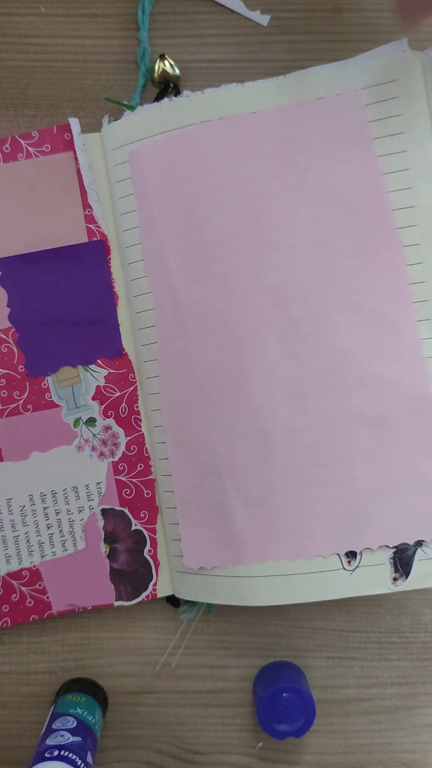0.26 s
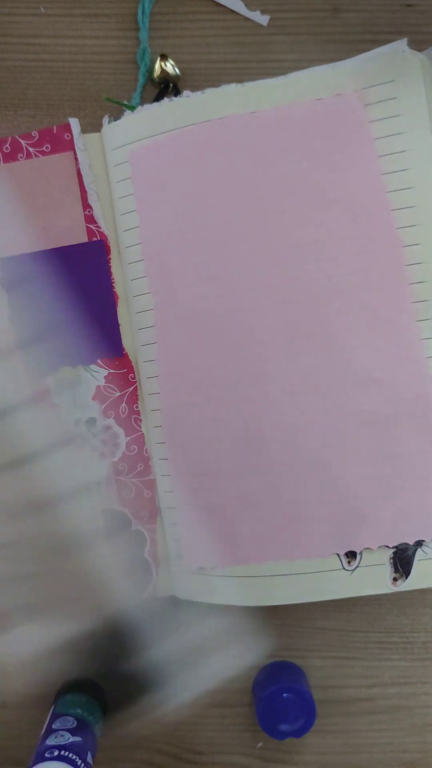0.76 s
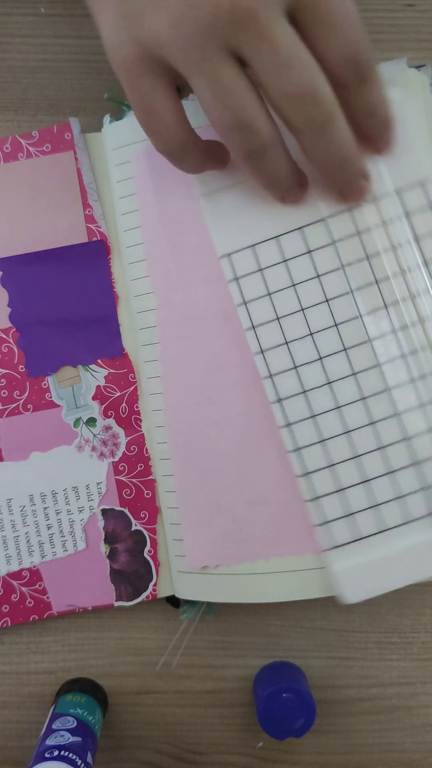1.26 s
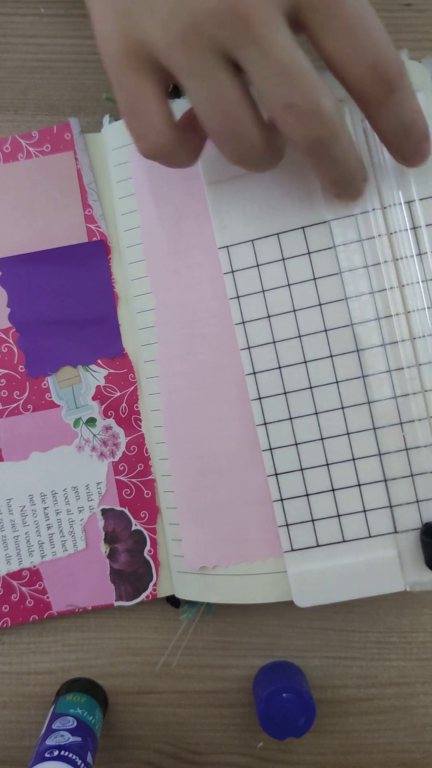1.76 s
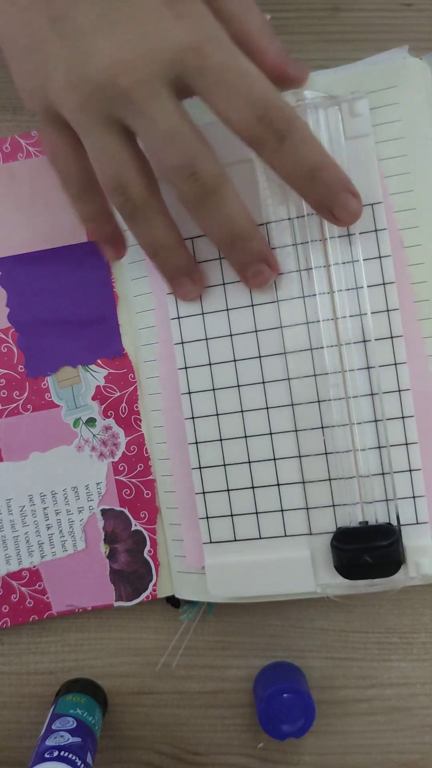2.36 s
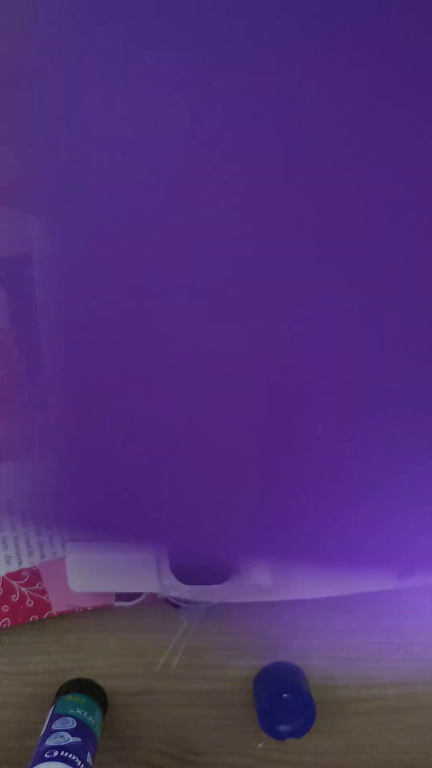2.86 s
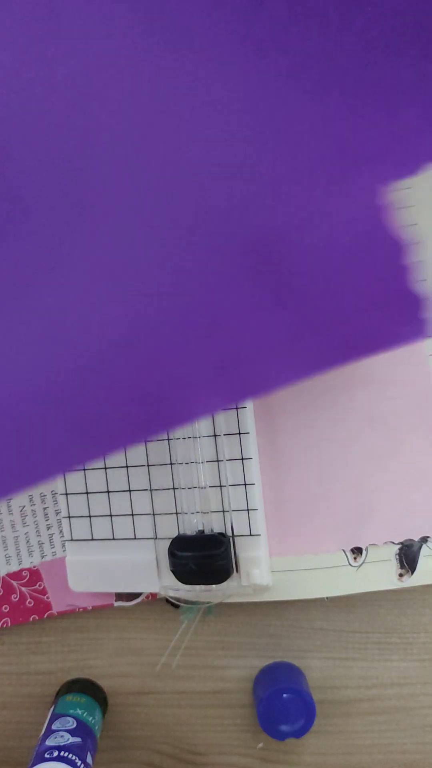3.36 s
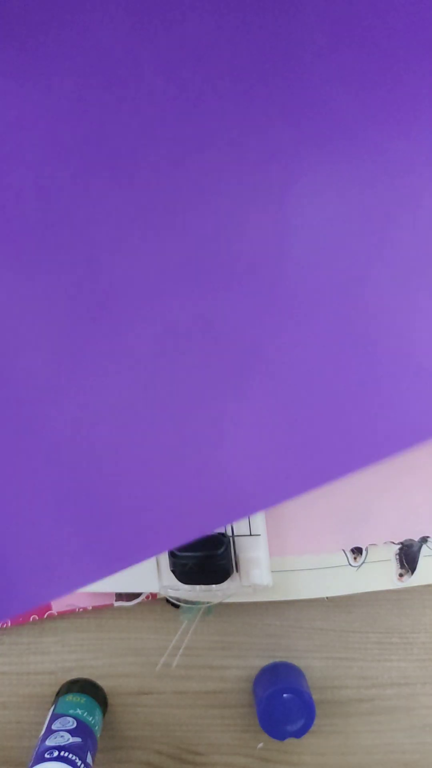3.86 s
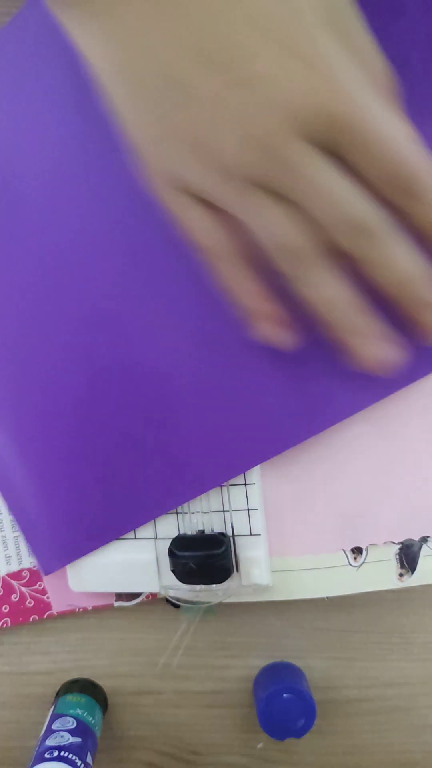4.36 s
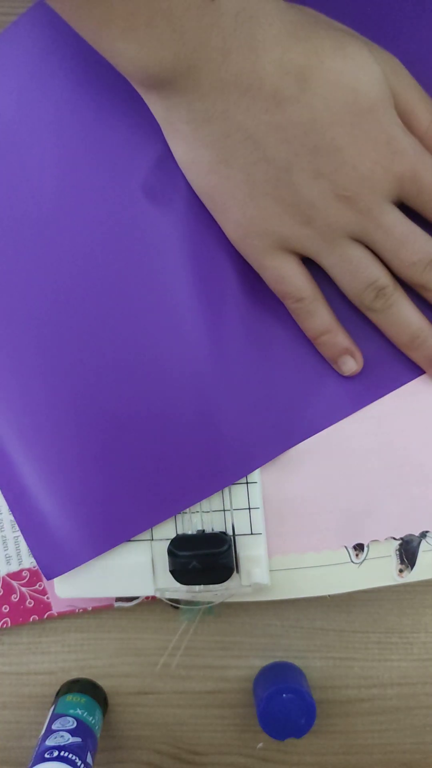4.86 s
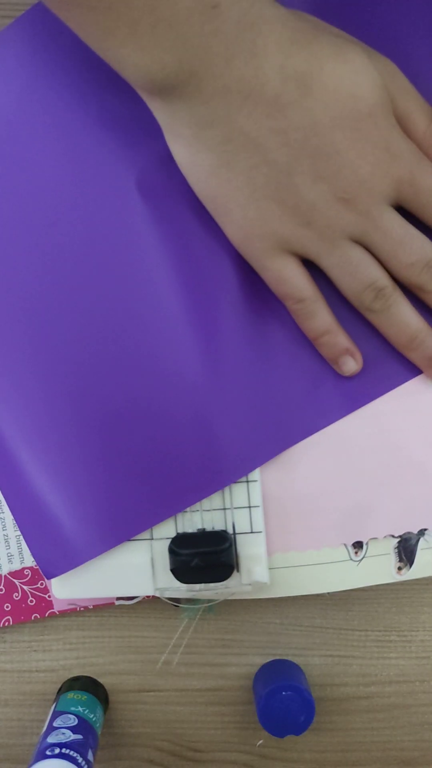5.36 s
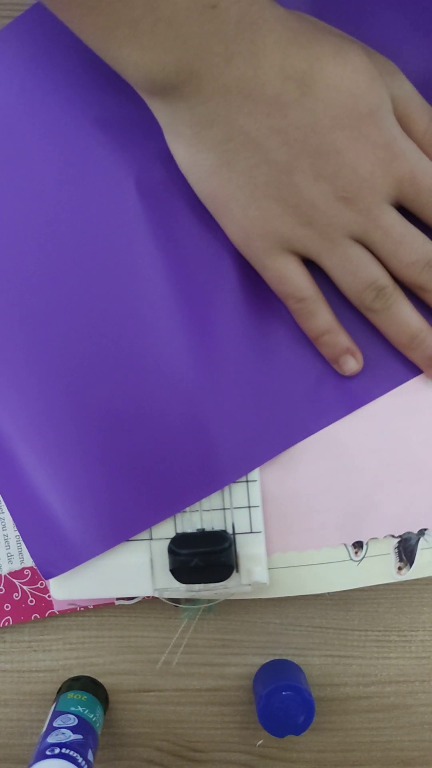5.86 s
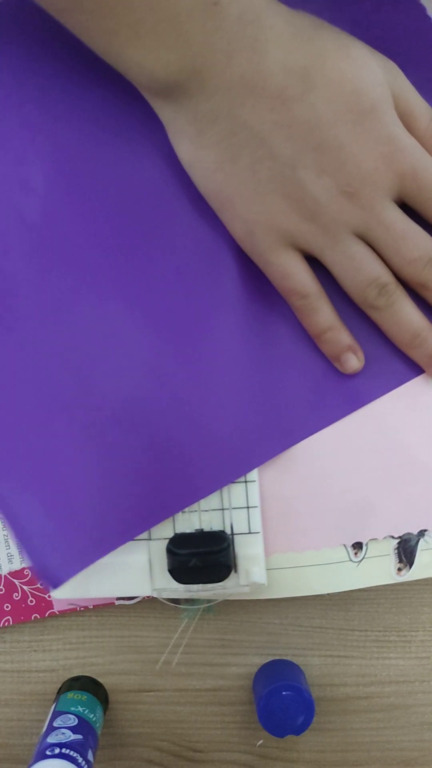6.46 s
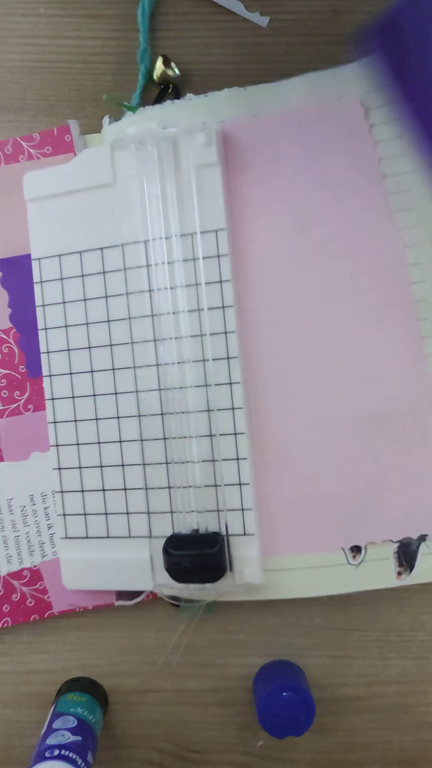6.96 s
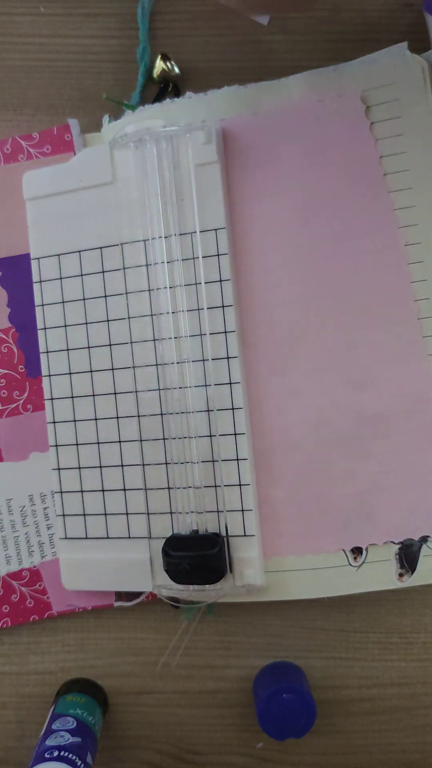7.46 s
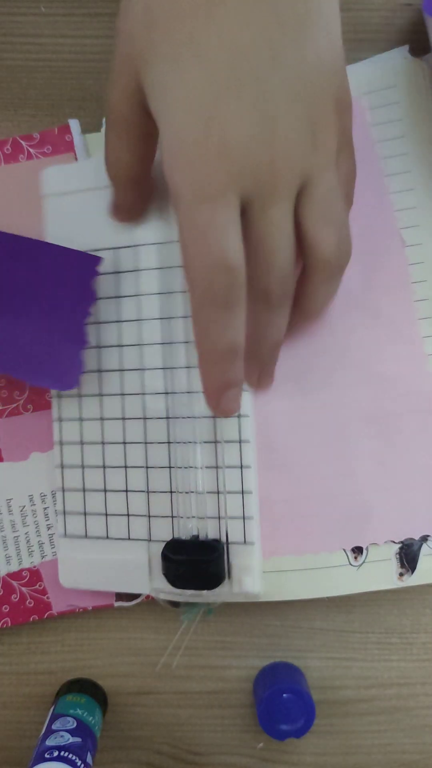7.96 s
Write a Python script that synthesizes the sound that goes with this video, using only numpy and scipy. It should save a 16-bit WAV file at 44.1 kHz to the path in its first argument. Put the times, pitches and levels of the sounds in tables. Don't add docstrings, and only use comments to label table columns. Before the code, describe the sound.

Sharp plastic knocks with quick rebounds, quiet sliding and paper handling, two short tearing pulls and one long harsh rip, then faint rustling.

```python
import sys
import numpy as np
from scipy import signal
from scipy.fft import rfft, irfft
from scipy.io import wavfile
from scipy.ndimage import uniform_filter1d

SR = 44100
rng = np.random.default_rng(int(sys.argv[2]) if len(sys.argv) > 2 else 0)


def attenuation_scalar(level_db):
    decades = np.asarray(level_db, float) / 20
    return 10 ** decades


def wav_record(signal):
    frames = np.transpose(np.atleast_2d(signal))
    bounded = np.clip(frames, -1, 1)
    quanta = np.round(bounded * 32767).astype(np.int16)
    wavfile.write(sys.argv[1], SR, quanta)


N = 362502


def tear():
    # t/s, level/dB
    pull_forces = [
        [(4.82, -60), (4.832, -58), (4.848, -39), (4.886, -42), (4.95, -85)],
        [(5.02, -63), (5.038, -62), (5.122, -52.5), (5.202, -54), (5.228, -66), (5.334, -50), (5.37, -97)],
        [(5.44, -71), (5.484, -62.5), (5.74, -56.5), (5.9, -51.5), (6.18, -44), (6.262, -35), (6.37, -36.5),
         (6.46, -37), (6.522, -35.5), (6.575, -82)],
    ]
    # t/s, peak level/dB, length/s
    pull_jerks = [(4.805, -38, .02), (4.815, -39, .02), (4.828, -34, .02), (5.033, -35, .03),
                  (5.061, -33, .03), (5.193, -32, .02), (4.843, -28, 0.032), (4.866, -26, 0.05),
                  (4.879, -24, 0.066), (4.901, -23.5, 0.036), (5.038, -28.5, 0.091), (5.07, -26.5, 0.043),
                  (5.08, -26, 0.036), (5.1, -27, 0.028), (5.125, -23, 0.081), (5.161, -20, 0.03),
                  (5.205, -29, 0.029), (5.217, -23, 0.06), (5.229, -19.5, 0.058), (5.138, -24.5, 0.044),
                  (5.1856, -31, .03), (5.27, -24, 0.13), (5.284, -25.5, 0.049), (5.24, -21.5, 0.027),
                  (5.304, -34, .04), (5.3244, -26.5, 0.03), (5.338, -32.5, 0.026),
                  (5.448, -35.5, 0.045), (5.473, -27.5, 0.14), (5.494, -25.5, 0.12), (5.521, -27.5, 0.12),
                 (5.537, -19, 0.038), (5.55, -26, 0.037), (5.507, -31, .04), (5.566, -24.5, 0.028),
                 (5.601, -24, 0.06), (5.613, -30, 0.093), (5.651, -32, 0.037), (5.673, -30, 0.037),
                 (5.689, -23, 0.035), (5.701, -26.5, .04), (5.735, -32, .03), (5.7496, -27, 0.07),
                 (5.766, -24, 0.028), (5.789, -27, 0.045), (5.812, -26.5, 0.031), (5.822, -25, .04),
                 (5.835, -16.5, 0.03), (5.847, -19, 0.05), (5.885, -19.5, 0.042), (5.891, -25.5, 0.027),
                 (5.918, -23.5, 0.043), (5.929, -18.5, 0.031), (5.934, -18.5, 0.026), (5.954, -18.5, 0.036),
                 (5.976, -20, 0.056), (5.988, -24, 0.038), (6.0046, -20.5, 0.046), (6.016, -24, 0.042),
                 (6.035, -20.5, 0.1), (6.057, -23.5, 0.047), (6.067, -21, 0.057), (6.094, -25, 0.04),
                 (6.102, -24, 0.038), (6.125, -27, 0.14), (6.155, -23, 0.079), (6.188, -26, 0.3),
                 (6.2, -30, .2), (6.249, -25, 0.035), (6.273, -15.5, 0.051), (6.285, -20, .04),
                 (6.308, -15, .02), (6.315, -19, 0.086), (6.343, -19, 0.067), (6.384, -6.5, 0.022),
                 (6.476, -24, 0.05), (6.482, -18, 0.044), (6.493, -18, 0.042), (6.516, -18.5, 0.049),
                 (6.536, -39, 0.031)]
    # sheet flex/dB, edge ring/dB, finest fibres/dB, board/dB
    pull_mix = [
        (-2.5, -11.5, 4.5, -36.5),
        (-3.5, -22, 0.5, -32),
        (-4, -14.5, -4, -34.5),
    ]
    # f/Hz, density level/dB
    fibre_spectrum = [(530, -46.5), (900, -7), (1940, 0.5), (2110, -10.5), (2350, -3), (3400, -3),
                      (5590, -1.5), (7480, 0.26), (9780, -6.5), (15900, -10), (16500, -30.5)]
    # f/Hz, bandwidth/Hz, level/dB
    sheet_modes = [(565, 90, -0.5), (834, 74, -8), (994, 180, -2.5), (1570, 820, -24)]
    # f/Hz, bandwidth/Hz, level/dB
    board_modes = [(881, 70, -9), (1576, 53, 3.5), (1740, 88, -6), (1950, 90, -1), (2797, 330, -2),
                   (3330, 150, -9), (3740, 130, -3), (4120, 60, -0.5), (4700, 80, -10), (5460, 100, -9),
                   (6100, 37, -2.5), (6950, 70, -9), (7560, 140, -2)]

    s, jerk_db, length = np.transpose(pull_jerks)
    steady = curve(pull_forces)
    jerks = bursts(s, jerk_db - 12.5, 0.82 * length, 0.002)
    snap_db, snap_s = -14.5, 0.0048
    snaps = bursts(s, jerk_db + snap_db, 0 * s + snap_s, 0.00022)
    force = crackle(2.4, 1., 600) * sticking() * (steady + jerks + snaps)

    pull_starts = [span[0][0] for span in pull_forces[1:]]
    pull = np.searchsorted(pull_starts, np.arange(N) / SR)
    flex, edge, fine, board = force * attenuation_scalar(np.array(pull_mix)[pull].T)
    edge = edge * np.clip(steady / attenuation_scalar(-40.5), .15, 3) ** .4
    edge = band(edge, 2280, 2440, order=1)

    sheet = ring(flex, [(hz, db, np.log(1000) / (np.pi * width)) for hz, width, db in sheet_modes])
    sheet = band(sheet, 400, 3000)
    board = ring(board, [(hz, db, np.log(1000) / (np.pi * max(width, 90))) for hz, width, db in board_modes])

    fibres = attenuation_scalar(0.5) * colour(force, fibre_spectrum)
    low_flex = attenuation_scalar(-19.5) * band(flex, 78, 320)
    fine = attenuation_scalar(-5.5) * band(fine, 9300, 21000)
    return fibres + attenuation_scalar(-37.0) * sheet + low_flex + edge + board + fine


def sticking():
    # end t/s, depth level/dB, length/s
    catches = [(5.07, -8, .01), (5.097, -8, .012), (5.125, -6, 0.0092), (5.161, -8, .01),
               (5.185, -10, .012), (5.268, -10, .016), (5.565, -6, .008), (5.6, -4, .015),
               (5.689, -6, .008), (5.747, -5, .008), (5.788, -8, .012), (5.812, -10, .012),
               (5.885, -4, 0.018), (5.917, -10, .012), (5.953, -10, .01), (5.976, -6, .008),
               (6.005, -12, .01), (6.094, -10, .01), (6.124, -8, 0.013), (6.186, -8, 0.011),
               (6.383, -5, .015), (6.474, -5, .012)]
    db = np.zeros(N)
    for end, depth_db, length in catches:
        size = int(np.clip(length, .003, .04) * SR)
        dip = np.sin(np.linspace(0, 2.4, size)) ** 2
        db[int(end * SR) - size:int(end * SR)] += min(depth_db, 0) * dip
    return attenuation_scalar(db)


def knocks():
    # t/s, crack peak level/dB, woody body level/dB, desk thud level/dB, crack length/s
    blows = [
        (0.0149, -12, -24, -34.5, 0.046),
        (0.3692, -3, -34.5, -32.5, 0.043),
        (0.393, -23, -34.5, -24, 0.067),
        (0.425, -30, -35.5, -32.5, 0.053),
        (0.46, -28.5, -40, -33, 0.027),
        (0.498, -59, -43, -31.5, 0.023),
        (0.5127, -44, -42.5, -37.5, 0.045),
        (0.5356, -39, -17, -22, 0.017),
        (0.5477, -57, -41, -27.5, 0.039),
        (0.601, -54, -49, -39.5, 0.04),
    ]
    # f/Hz, density level/dB
    crack_spectrum = [(180, -6), (300, -17), (1020, -13.5), (1600, -2.5), (2790, -2), (3710, -1.5),
                      (6140, 2), (7800, 2), (9810, -10), (14900, -17.5), (16500, -43)]
    # f/Hz, level/dB, T60/s
    desk_modes = [(124, -6.5, 0.096), (178, -1.7, 0.14), (249, -3.5, 0.11), (274, -1, 0.24), (345, -12, .2),
                  (565, -12.5, .18), (595, -5.5, 0.062), (665, -7, 0.032), (798, -4, 0.098)]
    # f/Hz, level/dB, T60/s
    plastic_modes = [(7065, -23, 0.14), (7740, -15, 0.04), (4650, -31.5, .06), (2740, -25.5, .05),
                     (1500, -24, .06)]

    s, crack_db, wood_db, thud_db, length = np.transpose(blows)
    rattle = crackle(1., 1., 500)
    buzz = bursts(s, crack_db - 23.0, 3.0 * length, 0.011)
    crack = colour(rattle * (bursts(s, crack_db - 11, length, .0006) + buzz), crack_spectrum)

    wood = band(rattle * bursts(s, wood_db, 2.0 * length, 0.00083), 700, 1100, order=1)
    wood = lowpass(wood, 2500, order=1)

    push = bursts(s, thud_db, 0.046 * length, 0.00031)
    thud = attenuation_scalar(-32.0) * ring(push * (0.75 + rng.standard_normal(N)), desk_modes)
    thud = band(thud, 75, 3000)

    hit_s = .3695
    impulse = 1. * (np.arange(N) == int(hit_s * SR))
    return crack + wood + thud + ring(impulse, plastic_modes)


def handling():
    # start t/s, length/s, level/dB, dull part relative to it level/dB
    rubs = [(1.145, 0.14, -62.5, -1), (1.291, 0.25, -65.5, -5.5), (1.55, .34, -69.5, -8.5),
            (1.963, 0.12, -63, -3.5), (2.065, 0.16, -59, -14), (2.232, 0.23, -65, -13),
            (2.435, 0.18, -64, -11), (2.606, 0.14, -62.5, -2.5), (2.747, 0.2, -59.5, -12),
            (3.05, 0.23, -71.5, 11), (3.282, 0.1, -73, 9), (3.426, 0.33, -83, 10), (3.75, 0.26, -72, 13.5),
            (3.992, 0.27, -73.5, 5), (4.259, 0.16, -69.5, 7.5), (4.42, 0.16, -68.5, 0),
            (4.569, 0.385, -65.5, -3), (6.544, 0.095, -70.5, 1), (6.636, 0.37, -56, -4.5),
            (6.98, 0.15, -58, -1.5), (7.12, 0.13, -68, 5.5), (7.28, 0.24, -81, 5),
            (7.494, 0.17, -69.5, -4.5), (7.635, 0.45, -67, -8), (8.02, 0.31, -65, -10)]
    # f/Hz, density level/dB
    bright_spectrum = [(710, -24), (1200, -5), (1540, -9.5), (2420, -6), (3400, -4), (5200, -8), (7740, -6),
                       (10600, -19.5), (15300, -18), (16000, -18), (16500, -61)]
    # f/Hz, density level/dB
    dull_spectrum = [(88, -17), (150, 1), (324, -15), (531, -3), (652, -12.5), (748, -3), (985, -4.5),
                     (2410, -15), (4000, -24), (6000, -45), (8800, -70)]
    # t/s, peak level/dB, f/Hz, notebook pad level/dB
    low_blows = [(.012, -22.5, 254, -31.5), (.388, -25, 167, -31), (0.418, -23.5, 202, -33),
                 (0.501, -23, 166, -31), (0.537, -17, 125, -32), (0.5387, -19, 165, -38),
                 (.6, -39, 150, -38.5), (0.556, -26.5, 125.4, -34), (1.29, -54, 83.4, -52),
                 (2.727, -48, 75.4, -57), (3.092, -41, 53.8, -48.5), (3.194, -38, 51.7, -43),
                 (3.209, -34, 119, -49), (3.515, -43, 60, -51), (3.799, -43, 125, -45),
                 (3.969, -45.5, 91, -41), (6.467, -39, 104, -53), (7.165, -45, 211, -44.5),
                 (7.19, -50, 299, -48.5), (7.181, -39.5, 112, -51), (7.519, -55, 189, -49.5)]
    # t/s, peak level/dB, f/Hz
    air_puffs = [
        (3.504, -30.5, 110),
        (2.0105, -43.5, 190),
    ]
    # t/s, peak level/dB, pitch f/Hz, brightness level/dB, length/s
    board_taps = [(.5375, -37.5, 2300, -22, 0.081), (.602, -49, 2450, -15, 0.078),
                  (1.149, -46.5, 1710, -6, 0.06), (1.177, -43, 1500, -4, .08), (1.2025, -44, 2000, 0, .02),
                  (1.1865, -32, 1800, 0, 0.04), (1.207, -34, 2200, 3, 0.029),
                  (1.3045, -40.5, 2390, 5.5, 0.057), (1.336, -44, 1480, -4, 0.06),
                  (1.4535, -47, 2450, 5, 0.047), (1.8562, -45.5, 2570, -10, 0.038),
                  (2.0095, -39, 1030, -49.5, 0.022), (2.1745, -45, 1380, -1, 0.04),
                  (2.201, -40.5, 2290, 6.5, 0.026), (2.09, -52.5, 1500, -8, .02),
                  (2.222, -51, 1500, 0, 0.028), (2.647, -52, 3000, -10, .02), (2.675, -57, 2500, 7, 0.053),
                  (2.4872, -49, 2770, -18, 0.083), (2.6006, -45, 2500, -24, 0.017)]
    # t/s, peak level/dB, pitch f/Hz, brightness level/dB, length/s
    soft_creases = [(1.283, -36.5, 1330, -8, 0.052), (2.72, -34, 1360, -15, 0.097),
                    (3.036, -44.5, 1590, 6.5, 0.047), (3.1274, -37.5, 1270, -8, 0.15),
                    (3.174, -36.5, 1710, -1, 0.15), (3.2144, -25.5, 2850, -7, 0.037),
                    (3.8104, -40, 1730, 0.5, 0.074), (3.8314, -27, 1740, -20, 0.021),
                    (3.9557, -30.5, 1970, -41, 0.046), (3.984, -40.5, 990, -7, 0.093),
                    (4.192, -38, 1210, -29, 0.095), (4.3644, -46.5, 910, 0, 0.071),
                    (4.6674, -39.5, 1100, -39, 0.057), (6.8488, -41.5, 1020, -1, 0.064),
                    (7.0844, -45, 2560, 4, 0.17), (7.168, -52, 600, -25, 0.09), (7.221, -49, 2980, 4, 0.14),
                    (7.9917, -50, 1070, -21, .072)]
    # t/s, peak level/dB, pitch f/Hz, brightness level/dB, length/s
    lift_crinkles = [(6.715, -49, 1900, 8, 0.028), (6.768, -49, 1390, 6, 0.028),
                     (6.811, -36, 870, -6, 0.02), (6.852, -39.5, 570, -21, 0.058),
                     (6, -42.5, 1200, -8, 0.022), (7.325, -61, 2500, 5, 0.03), (6.757, -58, 2600, 8, 0.04),
                     (6.712, -48, 840, -12, .03), (8.1, -46.5, 1060, -12, .05), (6.862, -43, 1500, -3, .02),
                     (6.938, -39.5, 2100, 4.5, 0.023), (7.111, -47, 3000, 7, 0.044),
                     (7.241, -49.5, 2300, 9.5, 0.026), (6.874, -36, 1940, -11, 0.012),
                     (6.923, -42.5, 1500, 1, 0.03), (7.068, -38, 2400, -17, 0.032)]
    # t/s, peak level/dB, pitch f/Hz, brightness level/dB, length/s
    sheet_taps = [(2.996, -60, 2620, -1, 0.07), (3.0915, -43, 2420, 0, 0.075),
                  (3.181, -39, 1870, -4, 0.013), (3.225, -35, 2480, -14, 0.022),
                  (3.253, -49.5, 2500, 7, .04), (3.363, -56.5, 1300, -1, .07),
                  (3.209, -28, 2640, -19, 0.024), (3.27, -48.5, 1970, 8.5, 0.032),
                  (3.503, -49, 1500, 6.5, 0.074), (3.5728, -49, 1510, -0.5, .028),
                  (3.54, -58, 1500, 7, .03), (3.63, -54.5, 2500, -1, 0.029), (3.78, -51, 1500, -4, .02),
                  (3.965, -32.5, 2290, -24, 0.027), (4.045, -57, 2000, 3, 0.038),
                  (3.676, -36, 1330, -33, 0.017), (3.7623, -40.5, 1620, -32, 0.079),
                  (3.8003, -38.5, 1550, -5.5, 0.048), (3.975, -27.5, 1430, -14, 0.026),
                  (4.1874, -46.5, 1350, -5, 0.023), (4.392, -52, 2400, 2, .02), (4.432, -58, 3500, 3, .03),
                  (4.481, -46, 3000, -9, 0.037), (4.644, -46, 2340, 4, 0.035),
                  (4.7602, -29.5, 2300, -17.5, 0.023), (7.5257, -50, 2950, -7, 0.024),
                  (7.5404, -56.5, 1570, 7.5, 0.036), (7.771, -58, 2900, 0, .041)]
    # t/s, peak level/dB, pitch f/Hz, brightness level/dB, length/s
    first_scrape = [
        (0, -31, 2560, -14, .08),
        (.013, -17.5, 2220, -19, 0.075),
    ]

    s, length, rub_db, dull_db = np.transpose(rubs)
    bright = colour(crackle(1.5, 1.5, 60) * strokes(s, length, rub_db), bright_spectrum)
    dull = colour(crackle(1.5, 2.5, 60) * strokes(s, length, rub_db + dull_db), dull_spectrum)

    s, db, hz, pad_db = np.transpose(low_blows)
    puff_s, puff_db, puff_hz = np.transpose(air_puffs)
    thumps = struck(s, hz, db, 0.082) - struck(puff_s, puff_hz, puff_db, 0.029)
    pad = band(rng.standard_normal(N) * bursts(s, pad_db, 0 * s + 0.088, 0.016), 104, 424)

    small = ticks(board_taps, 0.00065, body_db=-13.0)
    small += ticks(soft_creases, 0.011, body_db=-9.0)
    small += ticks(lift_crinkles, 0.0011, body_db=-12)
    small += ticks(sheet_taps, 0.0014, body_db=-6.5)
    small += ticks(first_scrape, 0.00014, body_db=-6.5)
    return bright + dull + thumps + pad + small


def strokes(s, length, db):
    attack_s, release_s = 0.042, 0.043
    env = np.zeros(N + 2 * SR)
    for start, hold, gain in zip(s, length, attenuation_scalar(db)):
        t = np.arange(int((hold + release_s) * SR)) / SR
        ramp = np.minimum(t / attack_s, 1 + (hold - t) / release_s)
        first = int(start * SR)
        env[first:first + len(t)] += gain * np.clip(ramp, 0, 1) ** 2
    return env[:N]


def struck(s, hz, db, t60):
    out, t = np.zeros(N + SR), np.arange(SR // 4) / SR
    for start, f, gain in zip(s, hz, attenuation_scalar(db)):
        first = int(start * SR)
        out[first:first + len(t)] += gain * np.sin(2 * np.pi * f * t) * 1000 ** (-t / t60)
    return out[:N]


def ticks(table, rise, body_db):
    s, mid_db, hz, brightness, length = np.transpose(table)
    dull_db = mid_db + body_db - 0.34 * brightness
    bright_db = mid_db + brightness
    snap = crackle(1.5, 1.5, 400)
    out = band(snap * bursts(s, dull_db - 8.5, 1.4 * length, 2 * rise), 470, 1050)
    out += band(snap * bursts(s, bright_db, 0.466 * length, rise), 2600, 8200)
    out = lowpass(out, 9000, order=2)
    for t0, db, f, d in zip(s, mid_db, hz, length):
        part = slice(int(t0 * SR), int(t0 * SR) + SR // 5)
        env = bursts([0], [db - 2.5], [d], rise, size=len(snap[part]))
        out[part] += band(snap[part] * env, 0.55 * f, 1.69 * f)
    return out


def crackle(spread_db, patchy_db, patch_rate):
    size = np.minimum(rng.exponential(size=N), 5)
    x = rng.standard_normal(N) * attenuation_scalar(spread_db * size + patchy_db * walk(patch_rate))
    return x / np.sqrt(np.mean(x ** 2))


def walk(rate):
    k = int(SR / rate)
    held = np.repeat(rng.standard_normal(N // k + 1), k)
    return 1.2 * uniform_filter1d(held, k)[:N]


def curve(spans):
    t = np.arange(N) / SR
    return sum(attenuation_scalar(np.interp(t, *np.transpose(s), -120, -120)) for s in spans)


def bursts(s, db, t60, rise, size=N):
    env = np.zeros(size + SR)
    for t0, gain, d in zip(s, attenuation_scalar(db), np.clip(t60, .004, .3)):
        t = np.arange(int(d * SR)) / SR
        first = int(t0 * SR)
        env[first:first + len(t)] += gain * np.minimum(t / rise, 1) * 1000 ** (-t / d)
    return env[:size]


def ring(x, modes):
    t = np.arange(SR // 2) / SR
    h = sum(attenuation_scalar(db) * np.sin(2 * np.pi * hz * t) * 1000 ** (-t / t60) for hz, db, t60 in modes)
    return signal.oaconvolve(x, h)[:N]


def colour(x, table):
    hz, db = np.transpose(table)
    log_hz = np.log(np.arange(1025) * SR / 2048 + 1)
    log_gain = np.interp(log_hz, np.log(hz), db) * np.log(10) / 20
    ceps = irfft(log_gain)
    ceps[1:1024] *= 2
    ceps[1025:] = 0
    h = irfft(np.exp(rfft(ceps)))
    return signal.oaconvolve(x, h / np.sqrt(np.sum(h ** 2)))[:N]


def band(x, lo_hz, hi_hz, order=2):
    sos = signal.butter(order, [lo_hz, hi_hz], "bandpass", fs=SR, output="sos")
    return signal.sosfilt(sos, x) * np.sqrt(SR / 2 / (hi_hz - lo_hz))


def lowpass(x, cut_hz, order):
    return signal.sosfilt(signal.butter(order, cut_hz, fs=SR, output="sos"), x)


def room(x, near_db=-19, far_db=-34, far_t60=0.22, dull_hz=5000):
    scatter_t60_s = .016
    port_lag, lag_spread = 18, 1
    hop = SR // 32
    t = np.arange(SR // 3) / SR

    def paths(fall):
        return fall * sum(ports_noise(len(fall), 230))

    walls = lowpass(paths(attenuation_scalar(far_db) * 1000 ** (-t / far_t60)), dull_hz, order=1)
    x = np.concatenate([np.zeros(hop), x, np.zeros(2 * hop)])
    out = signal.oaconvolve(x[None], walls, axes=1)
    for i in range(0, N + hop, hop):
        h = paths(attenuation_scalar(near_db) * 1000 ** (-t[:hop // 2] / scatter_t60_s))
        h[0, 0] += 1
        h[1, port_lag + rng.integers(-lag_spread, lag_spread + 1)] += 1
        piece = (x[i:i + 2 * hop] * np.hanning(2 * hop))[None]
        piece = signal.fftconvolve(piece, h, axes=1)
        out[:, i:i + piece.shape[1]] += piece
    return out[:, hop:hop + N]


def ports_noise(size, split_hz):
    shared, own = rng.standard_normal(size), rng.standard_normal((2, size))
    low, high = (signal.butter(2, split_hz, kind, fs=SR, output="sos") for kind in ("low", "high"))
    return signal.sosfilt(low, shared + 0.16 * own), signal.sosfilt(high, own)


def hush():
    # f/Hz, density level/dB
    hush_spectrum = [(12, -6.5), (20, 1), (43, -4.5), (55, -15.5), (91, -7), (108, -12.5), (237, -22.5),
                     (273, -27), (428, -36), (1740, -41.5), (1900, -40), (2060, -39.5), (5520, -45),
                     (15200, -47.5), (16500, -58.5)]
    hush_db, rumble_db = -48.5, -61.5
    lean_db, lean_s, lean_rise_s = 5, 2.4, 0.37
    rumble, hiss = ports_noise(N, 230)
    flicker = 1.3 * walk(10)
    lean = lean_db * (1 + np.tanh((np.arange(N) / SR - lean_s) / lean_rise_s)) / 2
    swell = attenuation_scalar(57.5 + flicker + rumble_db + lean)
    hz = np.arange(N // 2 + 1) * SR / N + 1
    table_hz, table_db = np.transpose(hush_spectrum)
    shape = attenuation_scalar(np.interp(np.log(hz), np.log(table_hz), table_db))
    out = irfft(rfft(swell * rumble + hiss) * shape, N)
    return out * attenuation_scalar(hush_db) / np.sqrt(np.mean(out ** 2))


def scene():
    return attenuation_scalar(4.3) * room(knocks() + handling() + tear()) + hush()


def roll_off(x):
    return signal.sosfilt(signal.butter(12, 16800, fs=SR, output="sos"), x)


def record(dry):
    # f/Hz, bandwidth/Hz, left level/dB, right level/dB
    gap_modes = [(553, 130, 0, -1), (1570, 370, -3.5, -5), (2340, 64, -16.5, -5), (7760, 970, -1.5, -16)]
    # f/Hz, left minus right level/dB
    port_tilt = [(60, 4.5), (110, -4), (200, -2), (380, 3.5), (700, 3), (1290, 4.5), (2380, -1),
                 (4400, -1.5), (8120, 9), (15000, -6)]
    for hz, width, *db in gap_modes:
        resonance = signal.lfilter(*signal.iirpeak(hz, hz / width, SR), dry)
        dry = dry + attenuation_scalar(np.array(db))[:, None] * resonance
    hz = np.arange(N // 2 + 1) * SR / N + 1
    table_hz, table_db = np.transpose(port_tilt)
    tilt_db = np.interp(np.log(hz), np.log(table_hz), table_db)
    ports = irfft(rfft(dry) * attenuation_scalar(np.array([tilt_db, -tilt_db]) / 2 - 2.0), N)
    ports = np.tanh(ports)
    ports = signal.sosfilt(signal.ellip(14, .2, 80, 15850, fs=SR, output="sos"), ports)
    return roll_off(ports)


dry = scene()
out = record(dry)
wav_record(out)
```